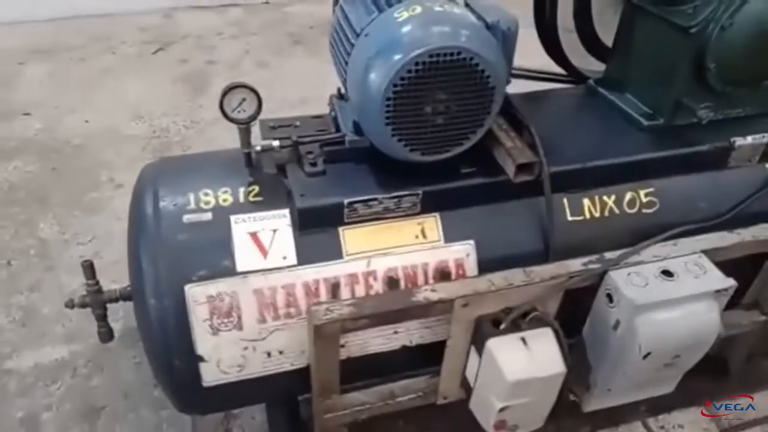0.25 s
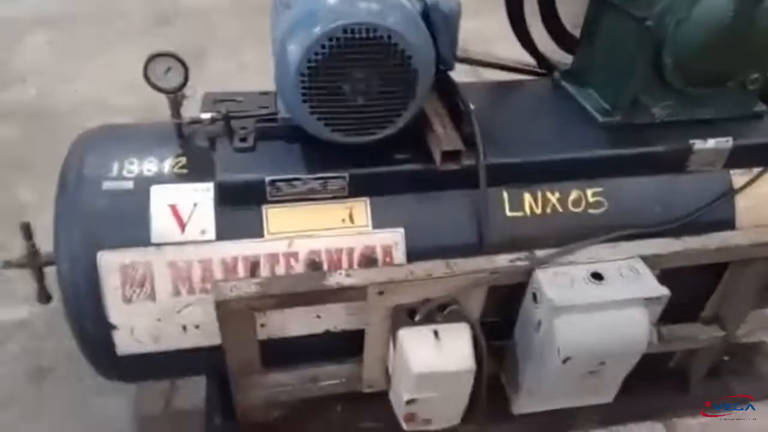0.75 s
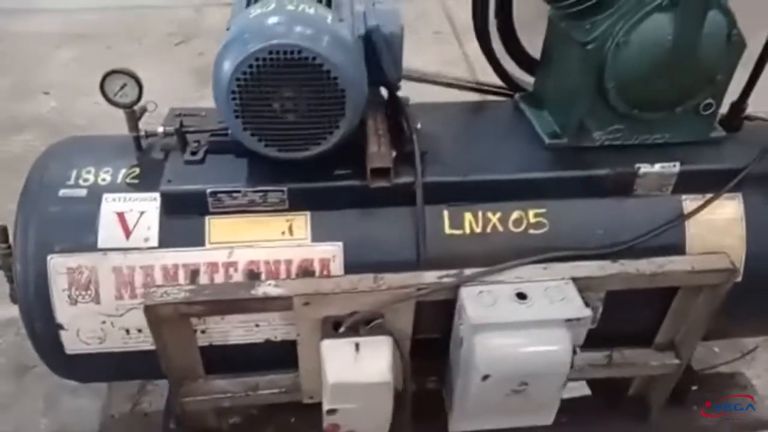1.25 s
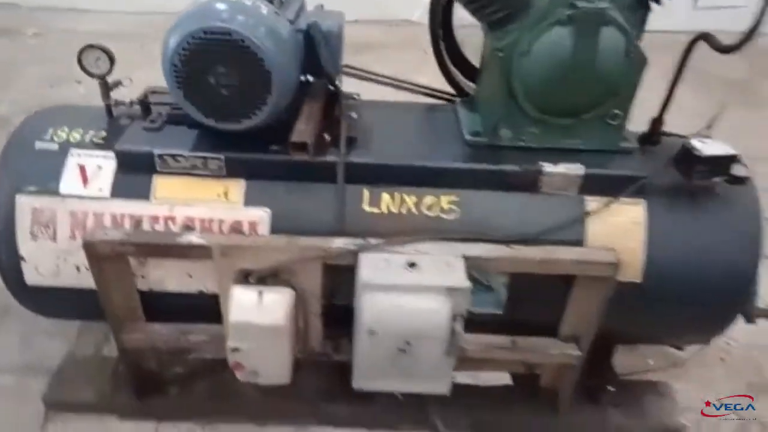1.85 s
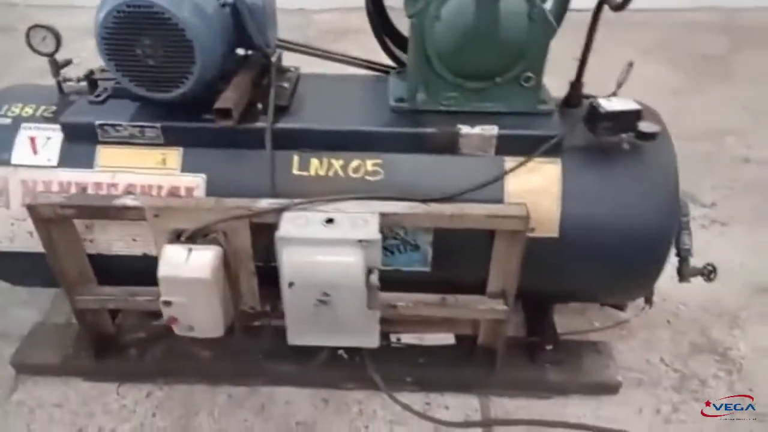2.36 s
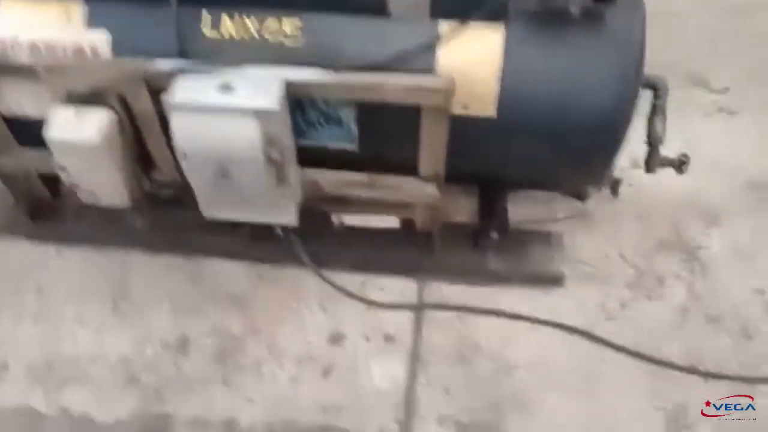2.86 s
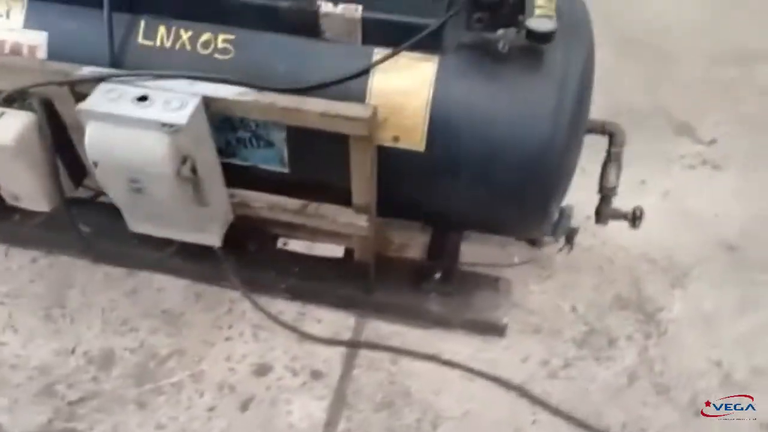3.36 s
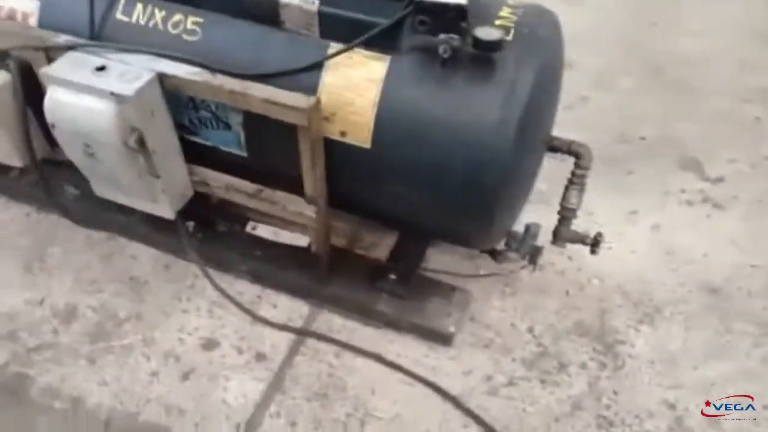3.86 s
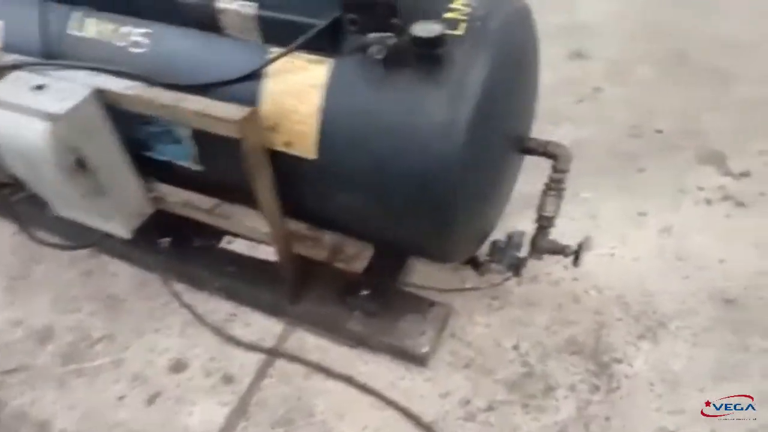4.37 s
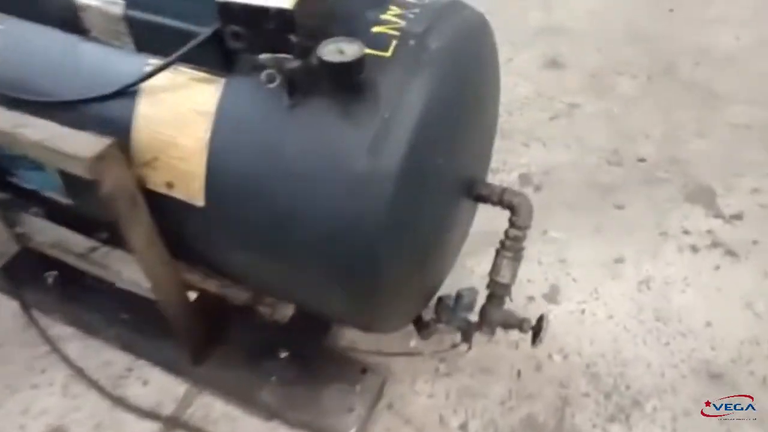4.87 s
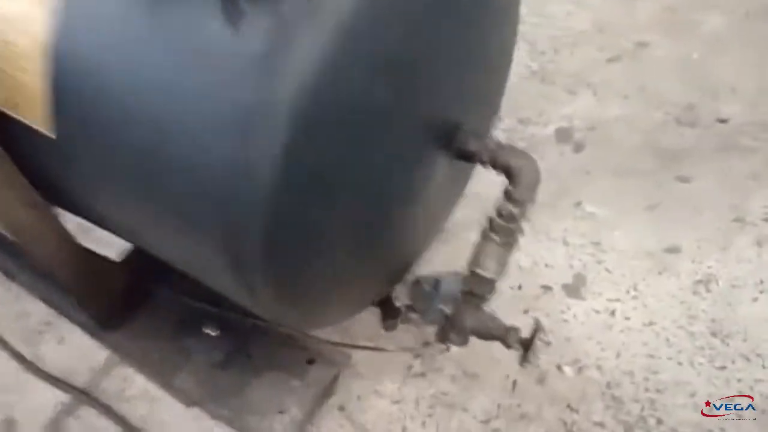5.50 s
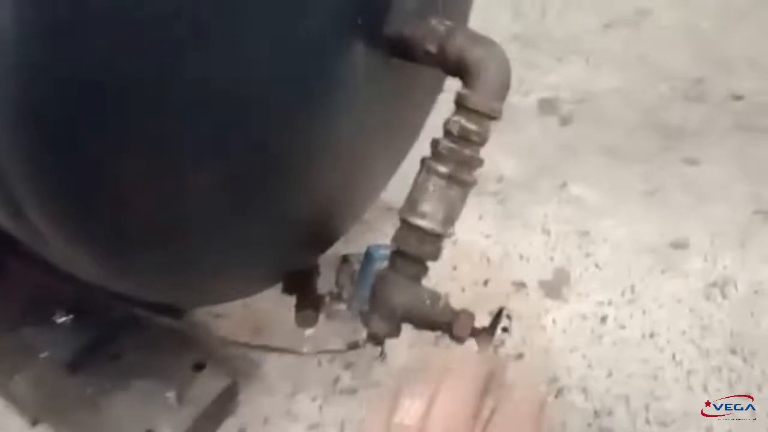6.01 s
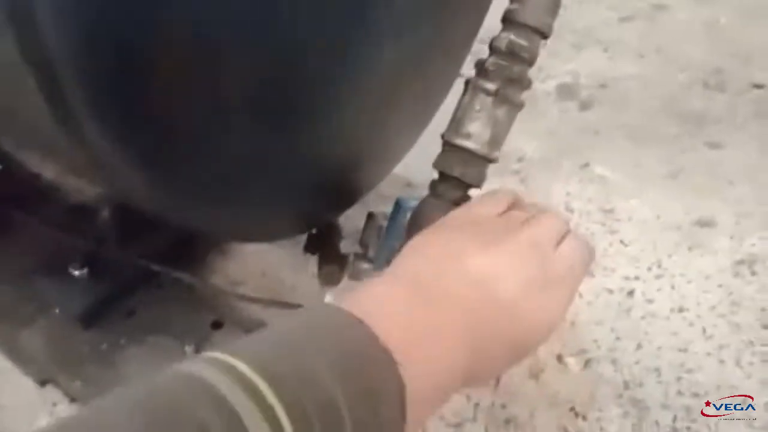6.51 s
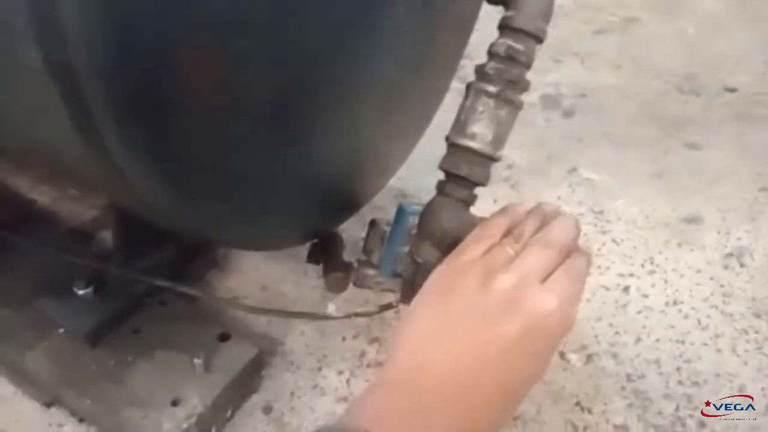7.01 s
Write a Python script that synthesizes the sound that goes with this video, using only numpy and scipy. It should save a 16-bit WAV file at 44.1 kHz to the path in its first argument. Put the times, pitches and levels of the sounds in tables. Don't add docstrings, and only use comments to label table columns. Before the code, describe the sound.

A steady hissing air leak with a breathy high whistle-like edge, over the rapid chugging of a piston compressor and low motor rumble in a workshop.

```python
import sys
import numpy as np
from scipy import signal
from scipy.fft import rfft, irfft
from scipy.io import wavfile
from scipy.ndimage import uniform_filter1d

SR = 44100
rng = np.random.default_rng(int(sys.argv[2]) if len(sys.argv) > 2 else 0)


def boost_factor(decibels):
    exponent = np.asarray(decibels, float) / 20
    return 10 ** exponent


def output_pcm(signal):
    pcm = np.clip(np.atleast_2d(signal).T, -1, 1) * 32767
    wavfile.write(sys.argv[1], SR, np.round(pcm).astype(np.int16))


N = 319725
HOP = 256
HZ = np.fft.rfftfreq(1024, 1 / SR)[:, None]
FRAME_S = np.arange(N // HOP + 5) * HOP / SR

# [t/s, turned to the tank end 0-1, nearness to the valve 0-1, jet beam level/dB,
# aim of the port (the microphone hole) at the jet/dB]
WALK_PATH = [(0, 0, 0.1, -16.5, -10), (.7, 0.13, 0.01, -17, -7), (1.3, 0.17, 0.02, -18, -18),
             (2.0, 0, 0, -18, -17), (2.4, 0, 0.05, -17.5, -18), (2.72, 1, 0, -30, -15),
             (2.95, 0.7, 0, -22.5, -10), (3.2, 0.77, 0.1, -15, -9), (3.45, 1, 0.09, -13.5, 2),
             (3.85, 0.54, 0.21, -14.5, 8.5), (4.05, 0.46, 0.3, -13.5, -2), (4.4, 0.17, 0.53, -14, -1),
             (5.1, 1, 0.46, -14, 3), (5.6, 1, 0.78, -15, 2), (6.3, 1, .9, -15.5, 3.5),
             (7.25, 0.2, 0.67, -14.5, 5)]


def evened(x):
    return x / np.sqrt(np.mean(x ** 2) + 1e-20)


def columns(rows, t):
    s, *values = np.transpose(rows)
    return [np.interp(t, s, v) for v in values]


def swells(rows, base_db, t):
    power = boost_factor(base_db) ** 2
    for s, length, db in rows:
        power = power + boost_factor(db) ** 2 * np.exp(-2 * ((t - s) / length) ** 2)
    return power


def shape(points, lo_hz, hi_hz):
    f, db = np.transpose(points)
    power = boost_factor(np.interp(np.log(HZ + 1), np.log(f + 1), db)) ** 2
    return power / power[(HZ > lo_hz) & (HZ < hi_hz)].sum()


def hump(hz, width, skirt_db, order=2, above_db=0.0):
    away = (HZ - hz) / width
    peak = np.exp(-abs(away) ** order)
    skirt = boost_factor(skirt_db + above_db * (away > 0)) ** 2 / (1 + away ** 2)
    power = peak + skirt
    return power / power.sum(0)


def patches(bins, frames):
    field = rng.standard_normal((len(FRAME_S), len(HZ))).T
    field = uniform_filter1d(field, bins, 0)
    return evened(uniform_filter1d(field, frames, 1))


def noise(power):
    a, b = rng.standard_normal((len(FRAME_S), len(HZ), 2)).T
    spectrum = np.sqrt(power) * (a + 1j * b)
    return signal.istft(spectrum, nperseg=1024, noverlap=768)[1][:N] * 1.107


def add(mix, s, sound):
    at = round(s * SR)
    mix[at:at + len(sound)] += sound


def motor(patchy_db=2.5):
    # [f/Hz, level/dB per Hz]
    rumble = [(20, -31), (60, -16), (150, -3), (230, -8), (295, -3.5), (370, 0.5), (480, -7.5), (590, 0),
              (750, -2), (1000, -2), (1600, -11)]
    # [t/s, level/dB]
    loudness = [(0, -37), (1.2, -35), (2.44, -38.5), (2.71, -32), (3.05, -45), (3.7, -44.5), (4.4, -39.5),
                (5.8, -43.5), (7.25, -39.5)]
    # [t/s, length/s, level/dB]
    gusts = [
        (.8, 0.11, -49),
        (2.88, .1, -48),
        (3.33, .08, -48),
        (4.6, 0.2, -41),
        (5.4, .15, -45),
        (5.8, .15, -34),
        (7.09, .12, -51),
    ]
    motor_db, = columns(loudness, FRAME_S)
    near = columns(WALK_PATH, FRAME_S)[1]
    wind = np.exp(-HZ / 60.) / 6.8 * swells(gusts, -73 + 7 * near, FRAME_S)
    power = boost_factor(motor_db) ** 2 * shape(rumble, 100, 1400) * (HZ < 1600) + wind
    return noise(power * boost_factor(patchy_db * patches(bins=2, frames=10)) ** 2)


def pump(open_s=0.038, answer_db=-9, lift_db=6.0):
    # [part, f/Hz, level/dB, entry/s, rise/s, ring/s]
    rings = [(0, 173, 7.5, 0, 0.0026, 0.0047), (0, 133, -8, 0.0087, 0.0037, 0.024),
             (1, 287.6, 2.5, 0.0055, 0.0037, 0.039), (1, 226, 0, 0.0036, 0.0013, 0.012),
             (1, 371, -0.5, 0.016, 0.0093, 0.027), (2, 594, 8.5, 0.0022, 0.01, 0.023),
             (2, 687, 1, 0.011, 0.0029, 0.016), (3, 882, -0.5, 0.002, 0.0071, 0.11),
             (3, 954, -4, 0.01, 0.0058, 0.19), (3, 800, -6.5, 0.00061, 0.0064, 0.043),
             (4, 1074, 7.5, 0, 0.0018, 0.0071), (4, 1163, 6, 0.0366, 0.0025, 0.012),
             (4, 1274, 0, 0.0043, 0.0063, 0.018)]
    parts_db = [
        -44,
        -45.5,
        -43,
        -45,
        -47.5,
    ]
    # [t/s, length/s, level/dB]
    loud_spots = [
        [(.9, 0.27, -37), (1.7, 0.52, -36), (2.72, .17, -32)],
        [(.15, 0.61, -36.5), (1.9, 0.7, -32.5), (2.7, 0.26, -25), (3.3, 0.21, -36), (4.1, 0.43, -39),
         (4.7, 0.21, -39)],
        [(.27, 0.32, -27.5), (.85, 0.32, -41), (1.47, 0.22, -36.5), (2.82, 0.18, -34), (3.3, 0.48, -41.5),
         (3.82, 0.15, -32.5), (4.25, 0.22, -37.5), (5.05, .33, -37.5)],
        [(1.1, 0.41, -39), (1.58, 0.11, -29), (2.05, 0.38, -37), (2.8, .25, -35), (4.6, .25, -38),
         (5.1, 0.14, -42)],
        [(.15, 0.26, -34.5), (.75, .15, -39), (1.5, 0.38, -33), (3.15, 0.58, -36), (4.7, 0.38, -32.5),
         (5.1, 0.14, -24), (5.5, 0.34, -33)],
    ]
    first_s, stroke_s = .055, .10193
    times = np.arange(first_s, N / SR, stroke_s)
    near = columns(WALK_PATH, times)[1]
    powers = [swells(rows, db - 3.5 * near, times) for rows, db in zip(loud_spots, parts_db)]
    heard = np.sqrt(powers).T
    chance = rng.standard_normal((len(times), 3, len(rings)))
    t, out = np.arange(2400) / SR, np.zeros(N + SR)
    shut = 1 / (1 + np.exp((t - open_s) / .004))
    for s, parts, (detune, phase, scatter) in zip(times, heard, chance):
        parts = parts * boost_factor(1.2 * scatter[:len(parts)])
        for (part, hz, db, entry, rise, ring), d, p in zip(rings, detune, phase):
            u = np.maximum(t - entry, 0)
            swell = (1 - np.exp(-(u / rise) ** 2)) * np.exp(-u / ring) * shut
            wave = np.sin(2 * np.pi * (hz * (1 + 0.0142 * d) * t + p))
            tone = parts[round(part)] * boost_factor(db + lift_db) * swell * wave
            add(out, s, tone)
            if hz < 400:
                add(out, s + 0.066, boost_factor(answer_db) * tone)
    return out[:N]


def leak(streak_db=2.5, thread_db=2.0, patchy_db=1.0, flicker_db=2.5, ridge_db=1.5):
    # [t/s, level/dB, centre f/Hz]
    cavity = [(0, -28.5, 4280), (.4, -24, 4350), (.85, -29, 4330), (1.4, -23.5, 4360), (2.2, -32, 4320),
              (2.75, -17.5, 4150), (3.1, -23, 3970), (3.45, -21.5, 3880), (3.9, -23, 3850),
              (4.2, -38, 4230), (4.6, -25, 3770), (5.1, -24.5, 3720), (5.48, -16, 3800),
              (5.62, -20.5, 3900), (5.8, -12.5, 4030), (5.98, -18, 3980), (6.2, -16, 4020),
              (7.25, -18, 3930)]
    # [f/Hz, level/dB per Hz]
    middle = [(600, -31), (1400, -14.5), (1700, -3.5), (2100, 3), (2600, -2.5), (3000, -5), (3800, 1),
              (4700, -5.5), (6000, 8), (8000, -45)]
    # [f/Hz, level/dB per Hz]
    hiss = [(4000, -6), (7000, 0), (8300, 0), (10000, -1), (12200, -3), (15500, -4)]
    # [t/s, length/s, f/Hz, level/dB]
    glints = [(0.922, 0.061, 4330, -24), (1.563, 0.05, 4374, -20.5), (2.435, 0.033, 5190, -17),
              (3.098, 0.11, 5800, -16.5), (3.416, 0.037, 3500, -23.5), (3.616, 0.043, 3490, -24.5),
              (4.41, 0.021, 4050, -15.5), (4.614, 0.074, 4006, -23.5), (5.443, 0.067, 4440, -25),
              (5.654, 0.035, 5010, -24.5), (4.378, 0.036, 694, -34), (4.802, 0.33, 615, -41.5),
              (5.213, 0.097, 610, -35.5), (6.55, 0.054, 2070, -29.5), (6.74, 0.034, 2140, -28),
              (1.03, 0.043, 4360, -32), (1.307, 0.039, 3550, -28), (7.055, 0.19, 2080, -32.5),
              (4.26, 0.022, 2220, -32.5), (4.61, 0.052, 2100, -25.5), (6.35, 0.012, 1980, -24.5),
              (2.52, 0.12, 4310, -25)]
    turned, near, upper_db, aim_db = columns(WALK_PATH, FRAME_S)

    lower_db = -19 - 28.5 * near
    upper_hz = 6346 + 251 * turned
    upper_width = 578 - 165 * turned + 280 * near ** 2
    core_db = upper_db - 8.0 + 2.5 * turned - 6.1 * near
    power = boost_factor(lower_db) ** 2 * hump(5640, 410, -14, order=2.4)
    power += boost_factor(upper_db) ** 2 * hump(upper_hz, upper_width, -59)
    power += boost_factor(lower_db - 6.0) ** 2 * hump(5790, 110, -30)
    power += boost_factor(core_db) ** 2 * hump(upper_hz, 160, -30)

    cavity_db, cavity_hz = columns(cavity, FRAME_S)
    cavity_width = 560 + 13 * (cavity_db + 15.5)
    ridges = boost_factor(ridge_db * np.cos(2 * np.pi * (HZ - 4000) / 410)) ** 2
    cavity_band = hump(cavity_hz, cavity_width, -13.5, order=6, above_db=0.5)
    power += boost_factor(cavity_db - 0.5) ** 2 * cavity_band * ridges

    for s, length, hz, db in glints:
        power += boost_factor(db) ** 2 * hump(hz, 31, -30) * np.exp(-((FRAME_S - s) / length) ** 2)

    middle_db = -30.5 - 0.5 * near - 0.18 * (upper_db + 15)
    hollow = boost_factor(-4.0 * near * np.exp(-((HZ - 2850) / 250) ** 2)) ** 2
    power += boost_factor(middle_db) ** 2 * shape(middle, 1500, 3000) * hollow
    power += boost_factor(-45 + 4 * near) ** 2 * hump(2095, 32, -30)

    treble = boost_factor(-46 + aim_db) ** 2 * shape(hiss, 7900, 8800)
    edge_s = .06
    facing = np.tanh((FRAME_S - 3) / edge_s) - np.tanh((FRAME_S - 4.4) / edge_s)
    treble += boost_factor(-36) ** 2 * hump(15300, 2600, -30) * facing / 2
    flicker = evened(uniform_filter1d(rng.standard_normal(len(FRAME_S)), size=2))
    power += treble * boost_factor(flicker_db * flicker) ** 2

    streaks = streak_db * patches(bins=2, frames=6)
    broad = patchy_db * patches(bins=5, frames=30)
    threads = thread_db * patches(bins=1, frames=18)
    texture = boost_factor(streaks + broad + threads) ** 2
    return noise(power * texture / texture.mean())


def scene():
    return (motor() + pump() + leak())[None]


def levelled(x, share=0.63, size=2500):
    quick, slow = (uniform_filter1d(x ** 2, n) + 1e-9 for n in (size, 8 * size))
    return x * (slow / quick) ** (share / 2)


def crude_rate(x):
    fine = signal.resample_poly(x, 160, 147)
    nearest = np.round(np.arange(N) * 160 / 147).astype(int)
    return fine[np.minimum(nearest, len(fine) - 1)]


def starve(x, sharpen=0.077, follow=0.85, boost_db=9.5, spare_db=8.0, size=1880):
    # [t/s, loss/dB, share of tones kept 0-1]
    starved = [(.63, 3, .05), (.641, 6, .05), (1.014, 30, .04), (1.269, 26, .04), (1.547, 22, .05),
               (2.444, 3, .04), (2.791, 12, .05), (2.901, 3, .05), (3.252, 28, .04), (3.347, 14, .04),
               (3.474, 24, .04), (3.539, 45, .04), (3.56, 45, .04), (3.658, 20, .05), (3.752, 20, .05),
               (4.264, 28, .04), (4.669, 28, .035), (6.02, 4, .03), (6.033, 9, .04), (6.142, 24, .04),
               (7.068, 7, .04), (7.083, 2, .03)]
    z = signal.stft(x, nperseg=1024, noverlap=768)[2]
    around = uniform_filter1d(abs(z), size=9, axis=0) + 1e-9
    z *= (abs(z) / around) ** sharpen
    x = signal.istft(z, nperseg=1024, noverlap=768)[1][:N] * boost_factor(-2.0)
    window = np.sin(np.pi * (np.arange(size) + .5) / size)
    left, lines = np.ones(N), np.zeros(N)
    for s, loss_db, share in starved:
        a = round(s * SR) - size // 2
        z = rfft(x[a:a + size] * window)
        level = np.log(abs(z) + 1e-9)
        stands = level - follow * uniform_filter1d(level, size // 30)
        kept = stands > np.quantile(stands[:size // 3], 1 - share)
        smooth = uniform_filter1d(abs(z), size // 60)
        spared = (smooth > smooth.max() * boost_factor(-spare_db)) & (loss_db < 40)
        kept &= ~spared
        lines[a:a + size] += 0.94 * (1 - boost_factor(-loss_db)) * window * irfft(z * spared, size)
        lines[a:a + size] += boost_factor(boost_db) * window * irfft(z * kept, size) / 2
        left[a:a + size] -= window ** 2 * (1 - boost_factor(-loss_db) ** 2)
    return x * np.sqrt(np.maximum(left, 6e-4)) + lines


def low_pass(x):
    return signal.sosfilt(signal.butter(12, 16480, fs=SR, output="sos"), x)


def record(dry):
    phone = starve(crude_rate(levelled(dry[0])))
    edge = signal.firwin(801, 15760, window=("kaiser", 9), fs=SR)
    limited = signal.oaconvolve(phone, edge, "same")
    return low_pass(limited[None])


dry = scene()
out = record(dry)
output_pcm(out)
```